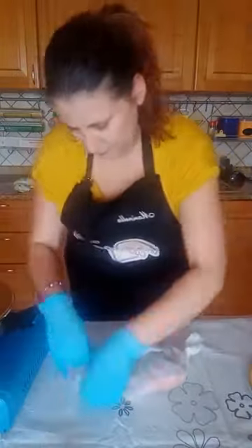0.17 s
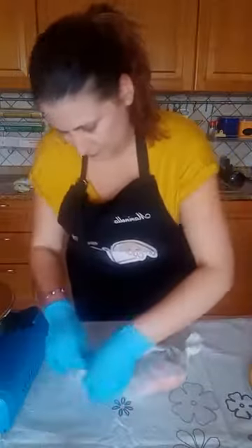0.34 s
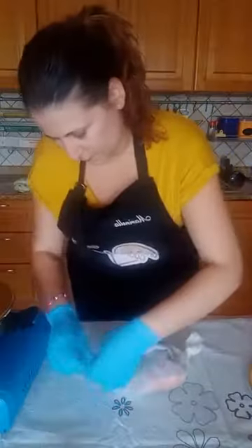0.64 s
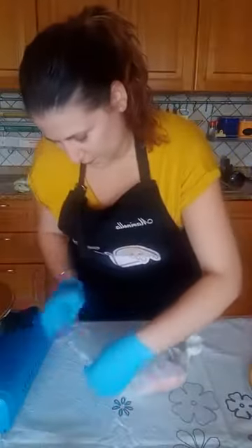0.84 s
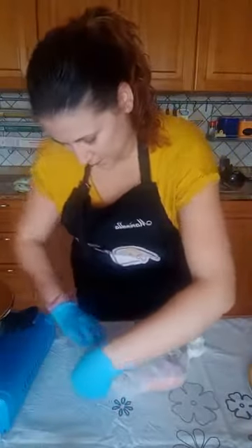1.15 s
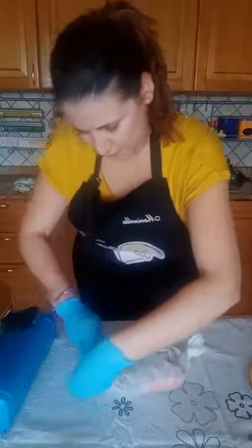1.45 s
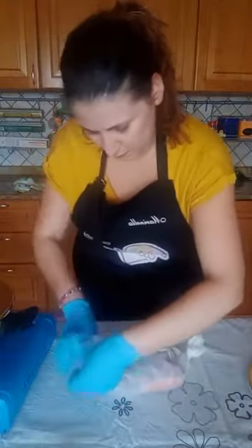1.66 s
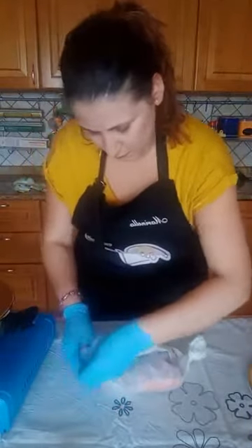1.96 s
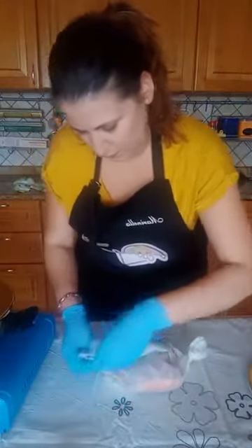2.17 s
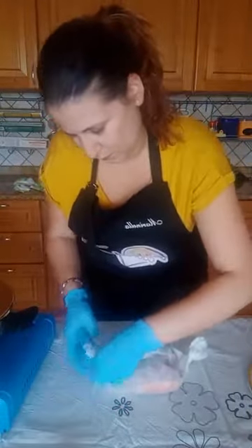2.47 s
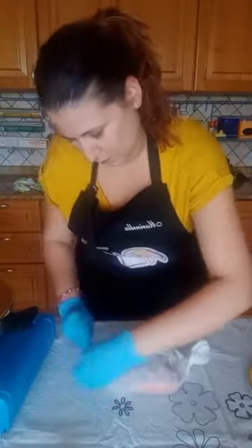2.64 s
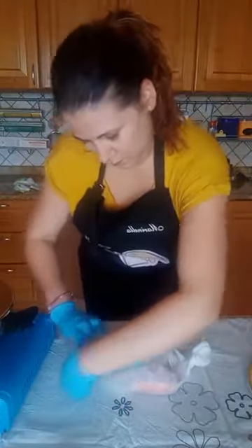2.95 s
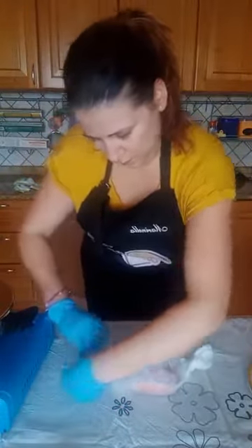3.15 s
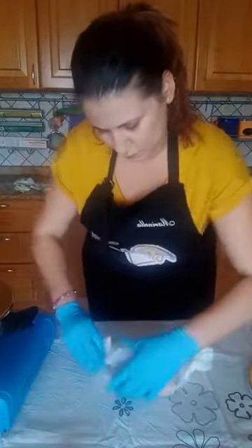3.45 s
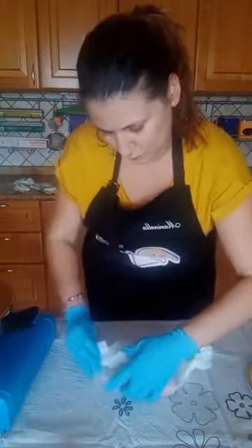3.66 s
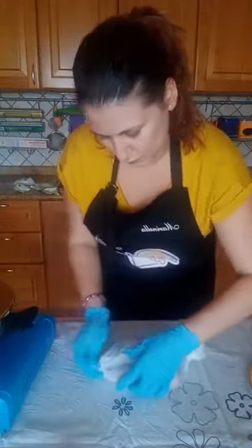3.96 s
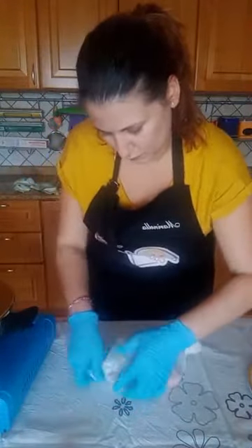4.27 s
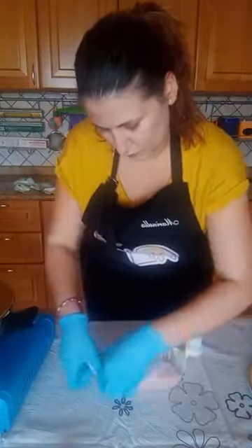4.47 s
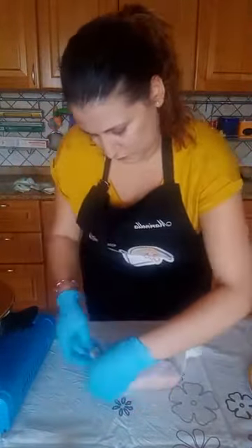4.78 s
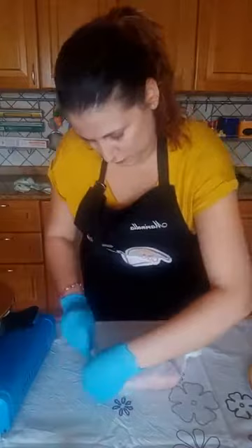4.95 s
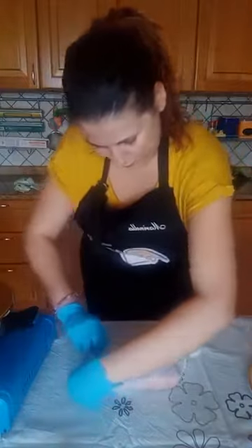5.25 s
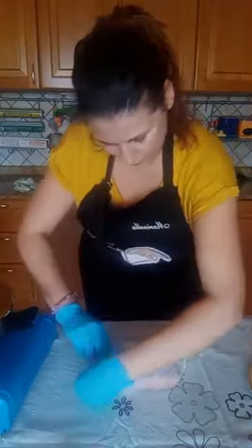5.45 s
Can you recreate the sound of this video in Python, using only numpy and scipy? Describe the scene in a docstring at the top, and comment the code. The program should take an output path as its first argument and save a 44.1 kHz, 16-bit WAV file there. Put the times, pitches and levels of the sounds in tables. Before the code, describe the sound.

A soft low thud on a table and a burst of dense paper crackle open the sound. Gloved hands then fold and twist baking paper in uneven squeezes, with sharp dry snaps, a brief high rasp near one second and occasional soft bumps. The crinkling thins in the last second and a half. Close microphone about a metre away, hard-walled kitchen with short reverberation, faint hum and thin hiss.

```python
"""A soft low thud on a table top and a swell of dense crackle come first,
over a faint low hum with a thin steady hiss near 2.7 kHz.
Gloved hands fold and twist a sheet of baking paper on a kitchen table, a metre from the microphone.
Creases buckle as clumped short pings and as sharp snaps of filtered noise; a taut edge rasps briefly.
Larger panels and the table's modes answer lower down; a hard-walled kitchen adds echoes and a short tail."""
import sys
import numpy as np
from scipy import signal
from scipy.fft import rfft, irfft
from scipy.io import wavfile

SR = 44100
rng = np.random.default_rng(int(sys.argv[2]) if len(sys.argv) > 2 else 0)


def unload_audio(sound):
    """Save the sound as a 16-bit wav file, at the path given as the first command line argument."""
    columns = np.transpose(np.atleast_2d(sound))
    # keep every value between -1 and 1, then stretch to whole-number steps
    steps = np.round(np.clip(columns, -1, 1) * 32767)
    wavfile.write(sys.argv[1], SR, steps.astype(np.int16))


N = 247439


def gain_of(db):
    """Level definition: decibels become an amplitude factor."""
    return 10 ** (np.asarray(db) / 20)


def evened(x):
    """Power normalisation: scales a signal to rms 1."""
    return x / np.sqrt(np.mean(x ** 2) + 1e-20)


def read(points, hz):
    """Logarithmic frequency scale: interpolates a curve evenly per octave."""
    f, value = np.transpose(points)
    return np.interp(np.log(hz + 1), np.log(f + 1), value)


def follow(rows):
    """Piecewise-linear envelopes: each column of a timed table at every sample."""
    s, *columns = np.transpose(rows)
    return [np.interp(np.arange(N) / SR, s, column) for column in columns]


def resonate(x, hz, width):
    """Simple resonance: a second-order peak filter with gain 1 at its centre."""
    b, a = signal.iirpeak(hz, hz / width, SR)
    return signal.lfilter(b, a, x)


def ping(hz, cycles):
    """Damped free oscillation: a buckling patch rings for a few dying cycles, energy 1."""
    turns = np.arange(0, 7 * cycles, hz / SR)
    onset = 1 - np.exp(-turns / 0.81)
    wave = np.sin(2 * np.pi * turns) * np.exp(-turns / cycles) * onset
    return wave / np.linalg.norm(wave)


# Noise spectrum of the idle room, relative: (frequency [Hz], density [dB per Hz])
ROOM_SPECTRUM = [(18, -44), (30, -3), (115, 9), (156, -21), (300, -19), (1480, -33), (2680, 0), (3740, -15),
                 (6600, -19), (14300, -32)]
ROOM_DB = -65.5  # rms level


def idle_room():
    """Stationary coloured noise: white noise shaped into a low hum and a thin hiss near 2.7 kHz."""
    spectrum = rfft(rng.standard_normal(N))
    shaped = spectrum * gain_of(read(ROOM_SPECTRUM, np.fft.rfftfreq(N, 1 / SR)))
    return gain_of(ROOM_DB) * evened(irfft(shaped, N))


# A hand or the parcel lands, before the table responds: (time [s], peak level [dB], pitch [Hz])
THUDS = [(0.0, -27.5, 145), (0.226, -35, 400), (0.325, -58, 345), (0.5127, -25, 794), (0.517, -27.5, 403),
         (1.91, -35.5, 410), (2.198, -40.5, 180), (2.869, -37, 380), (2.878, -40, 250), (3.472, -40.5, 325),
         (3.772, -33.5, 570), (4.288, -40, 322), (5.057, -44, 700), (5.073, -51, 292), (5.35, -46, 202),
         (5.388, -53, 215), (5.424, -48, 300)]


def thuds():
    """Impact excitation: each landing is one soft, heavily damped push."""
    out = np.zeros(N + SR)
    for s, peak_db, hz in THUDS:
        push = ping(hz, cycles=0.72)
        at = round(s * SR)
        out[at:at + len(push)] += gain_of(peak_db) * push / abs(push).max()
    return out[:N]


# Modes of the table top: (frequency [Hz], width [Hz], level [dB])
TABLE_MODES = [(123.8, 2.4, -8), (208.5, 13, -8), (403.9, 6.4, 2.5)]


def table(x):
    """Modal superposition: pressure on the top is heard directly and through its modes."""
    modes = sum(gain_of(db) * resonate(x, hz, width) for hz, width, db in TABLE_MODES)
    return 0.63 * x + modes


# Each squeeze or twist swells, then dies away; the last three levels are relative to the crackle:
# (start [s], swell [s], crackle [dB], fade [dB/s], small panels [dB], large panels [dB], weight [dB])
SQUEEZES = [(-0.02, 0.0086, -41.5, 22.5, -3, -5.5, -9.5), (0.2, 0.026, -44.5, 13.5, -2.5, -6.5, -30),
            (0.31, 0.033, -45, 71, -11, -17, -16), (0.5, 0.064, -39.5, 60, -4, -10, -18),
            (.62, 0.036, -49.5, 77, -3, -2, -5.5), (0.77, 0.13, -57, 33, -3.5, -26, -23),
            (0.93, 0.11, -45, 43, -5, -10.5, -26), (1.04, 0.031, -39, 26, -7.5, -11, -21.5),
            (1.1, 0.12, -42.5, 35, -5, -10, -18.5), (1.24, 0.037, -44, 11, -4.5, -10.5, -17),
            (1.36, 0.032, -44, 40, -5, -8.5, -33), (1.53, 0.014, -47, 25, -4, -8.5, -30),
            (1.63, .04, -49.5, 24, -10, -10, -12), (1.75, 0.072, -53, 22, -2, -5, -24),
            (1.85, 0.029, -40.5, 66, -4.5, -17, -35), (1.94, 0.024, -48, 53, -4, -12, -15),
            (2.04, 0.11, -52, 23, -4, -10, -18), (2.15, 0.051, -40.5, 22.5, -6.5, -11, -21.5),
            (2.28, 0.12, -43.5, 59, -5.5, -6.5, -36), (2.44, 0.011, -58, 53, 0, -9, -35),
            (2.58, 0.038, -48, 18, -8, -23, -26), (2.74, 0.028, -47, 31, -7, -13, -13),
            (2.85, 0.017, -46.5, 37, -3, -6.5, -15), (2.94, 0.037, -52, 58, -5, -16, -4),
            (3.06, 0.094, -43.5, 22.5, -7, -17.5, -36), (3.23, 0.035, -44.5, 19, -8, -14, -20.5),
            (3.385, 0.056, -40.5, 80, -5, -11.5, -36), (3.49, 0.12, -51.5, 26, -0.5, -8, -20),
            (3.6, 0.099, -44.5, 13.5, -8, -14, -18.5), (3.75, 0.0046, -43.5, 31, -10, -12.5, -33),
            (3.84, 0.025, -47.5, 51.5, -4, -28, -28), (3.97, 0.14, -55.5, 36, 1.5, -5, -14),
            (4.19, 0.016, -58.5, 64, -17, 0, -25), (4.28, 0.082, -55, 61, -13, -3.5, -12),
            (4.455, 0.038, -50, 68, -3.5, -12.5, -18), (4.53, 0.013, -56, 76, 0.5, -2.5, -17),
            (4.68, 0.0082, -53.5, 41, -5.5, -35, -11.5), (4.81, 0.098, -51.5, 97, -8, -45, -15.5),
            (4.95, 0.1, -65, 64, -13, -21, 4.5), (5.063, 0.016, -48, 87, -15.5, -14, -21),
            (5.16, 0.021, -55, 47, -6.5, -11, -12), (5.34, 0.0071, -60.5, 40, -2, -8, -8),
            (5.45, 0.02, -57.5, 52, -10, -32, -8)]
# Factors on each squeeze's fade: (crackle [ratio], small panels [ratio], large panels [ratio], weight [ratio])
FADE_SPEEDS = [1.374, 1.39, 1.55, 1.73]
SWELL_BEND = 1.2  # power grows as this exponent of the swell time


def handling():
    """Incoherent addition: the powers of all squeezes add, giving four level curves."""
    start, swell, crackle_db, fade, *panels_db = np.transpose(SQUEEZES)
    step = 64  # samples between points of the curves
    age = np.arange(0, N + step, step)[:, None] / SR - start
    rising = np.clip(age / swell, 0, 1) ** SWELL_BEND
    faded_db = fade * np.maximum(age - swell, 0)
    curves = []
    for relative_db, speed in zip([0, *panels_db], FADE_SPEEDS):
        amplitude = gain_of(crackle_db + relative_db - speed * faded_db)
        level = np.sqrt((rising * amplitude ** 2).sum(axis=1))
        curves.append(np.interp(np.arange(N) / step, np.arange(len(level)), level))
    return curves


def clumping(length_ms, depth_db):
    """Cascade triggering: a crease sets off its neighbours, so buckling comes in fast-starting bursts."""
    # a second of lead-in lets the drift settle
    kicks = rng.standard_normal(N + SR) * (rng.random(N + SR) < 400 / SR)
    decay = np.exp(-1000 / (length_ms * SR))
    drift = signal.lfilter([1], [1, -decay], abs(kicks))[SR:]
    burst = gain_of(depth_db * evened(drift - drift.mean()))
    return burst / burst.mean()


def grains(lo_hz, hi_hz, per_s, cycles, spread_db, clumps, count):
    """Random impulse excitation: each pitch has its own sparse train, and all crowd into the same clumps."""
    out = np.zeros(N)
    for hz in np.geomspace(lo_hz, hi_hz, count):
        fires = rng.random(N) < per_s / count / SR * clumps
        size_db = spread_db * np.minimum(rng.exponential(1, N), 5)
        size = gain_of(size_db) * rng.choice([-1, 1], N)
        out += np.sqrt(hz) * signal.oaconvolve(fires * size, ping(hz, cycles))[:N]
    # a small patch is too small to radiate far below its own pitch
    highpass = signal.butter(4, 0.67 * lo_hz, "highpass", fs=SR, output="sos")
    return evened(signal.sosfilt(highpass, out))


def crackle():
    """Size scaling: small creases ring high, panels of the parcel lower, the load on the table lowest."""
    creases, small_panels, large_panels, weight = handling()
    clumps = clumping(length_ms=8., depth_db=5.5)
    even = clumps ** 0.55  # bigger panels buckle more evenly
    fine = grains(2910, 8700, per_s=3000, cycles=1.34, spread_db=1.0, clumps=clumps, count=16)
    sheen = grains(9900, 12400, per_s=4300, cycles=1.4, spread_db=.6, clumps=clumps, count=4)
    small = grains(925, 2554, per_s=2200, cycles=1.08, spread_db=1.5, clumps=even, count=8)
    large = grains(396.0, 910, per_s=900, cycles=1.0, spread_db=2.5, clumps=even, count=8)
    pushes = grains(95.0, 276, per_s=300, cycles=1.73, spread_db=3.0, clumps=even, count=5)
    panels = small_panels * small + large_panels * evened(table(large))
    load = weight * evened(table(pushes))
    return creases * (fine + gain_of(-6.5) * sheen) + panels + load


# Decay time of the room: (frequency [Hz], t60 [s])
KITCHEN_DECAY = [(150, 0.3), (800, 0.36), (3000, 0.5), (9000, 0.35)]


def tail():
    """Frequency-dependent reverberation: random-sign taps die at each band's own speed, energy 1."""
    taps = np.zeros(SR // 2)
    at = np.arange(600, len(taps) - 20, 20)
    taps[at + rng.integers(0, 20, len(at))] = rng.choice([-1., 1.], len(at))
    hz, t, z = signal.stft(taps, SR, nperseg=256)
    fall_db = -60 * t / read(KITCHEN_DECAY, hz)[:, None]
    decay = signal.istft(z * gain_of(fall_db), SR, nperseg=256)[1]
    return decay / np.linalg.norm(decay)


# Early reflections from table, wall and cupboards: (nominal delay [ms], level [dB])
ECHOES = [(1.1, -37), (5.6, -16.5), (8.3, -14), (12.5, -18)]
TAIL_DB = -3  # energy of the tail re the direct sound


def kitchen(x):
    """Image-source variation: the hands keep moving, so echoes and tail drift among several places."""
    out, places = x.copy(), 4
    turn = np.arange(N) / SR / .35  # one round of the places takes 0.35 s
    for place in range(places):
        response = gain_of(TAIL_DB) * tail()
        for ms, db in ECHOES:
            delay_ms = ms * (1 + .08 * rng.uniform(-1, 1))
            response[round(delay_ms * SR / 1000)] += gain_of(db)
        # equal-power crossfade between neighbouring places
        away = abs((turn - place / places + .5) % 1 - .5) * places
        share = np.cos(np.pi / 2 * np.minimum(away, 1))
        out += signal.fftconvolve(x * share, response)[:N]
    return out


# Single creases that snap; nominal peak, knock level relative to the snap's tick:
# (time [s], peak level [dB], pitch [Hz], knock level [dB], knock pitch [Hz], decay [ms])
SNAPS = [(0.0592, -23.5, 5840, -11, 925, 3), (0.075, -29, 6000, 4, 1500, 1.9),
         (0.0825, -21, 6570, -4, 1360, 5.1), (0.0885, -21, 5700, -10, 915, 2.4),
         (0.095, -37, 6000, -21, 1500, 1.4), (0.146, -27, 7000, 0.5, 1600, 1.2),
         (0.1544, -17.5, 5800, -4.5, 1260, 1.2), (0.159, -24, 6500, -20, 1500, 0.75),
         (0.2286, -30, 6500, -13, 1330, 2.7), (0.2391, -19.5, 6200, -12, 1500, 0.55),
         (0.3262, -25, 6060, -10, 556, 2.9), (0.359, -25.5, 6200, -0.5, 1100, 1.4),
         (0.4866, -31.5, 6600, 1, 1500, 1.5), (0.508, -40, 6000, -17, 2000, 1.2),
         (0.5141, -26, 6400, 10.5, 1820, 0.65), (0.516, -21, 5500, -13, 1900, 2.4),
         (0.5464, -28, 6600, -28, 412, 3.7), (0.5677, -24, 6000, -8, 890, 3.5),
         (0.5823, -23, 6400, -20, 1490, 1.3), (0.6357, -22.5, 6560, -9, 420, 2.6),
         (0.708, -25.5, 6200, -20, 1500, .7), (0.7928, -25, 5900, -25, 2310, 2),
         (0.837, -28.5, 3800, -48, 1260, 0.84), (0.853, -26, 8150, -20, 1500, .9),
         (0.8795, -27.5, 7000, -27, 2000, 0.69), (1.0006, -27.5, 7600, -7, 890, 0.59),
         (1.019, -28, 8500, -20, 1640, 1.2), (1.0465, -23, 5500, -3.5, 730, 1.2),
         (1.0595, -27, 6300, -21, 2200, 1.1), (1.12, -23, 9000, -34, 401, 2),
         (1.1355, -22, 8900, -16, 810, 1.9), (1.143, -12.5, 8950, -32, 814, 1.3),
         (1.216, -24, 6570, -15, 1137, 2.3), (1.2312, -28, 7000, -19, 1500, 1.2),
         (1.274, -22.5, 6330, -23, 1520, 2.2), (1.2972, -23, 6600, -11, 900, 1.1),
         (1.3176, -27, 5560, -13, 2400, 0.92), (1.5469, -30.5, 5570, 4, 2170, 4.1),
         (1.5728, -21.5, 6540, -27, 2020, 1.1), (1.611, -24.5, 6640, -27, 2400, 2.5),
         (1.65, -20.5, 6450, -9, 780, 0.86), (1.695, -27, 7500, -16, 2000, 0.64),
         (1.727, -25, 5940, -17, 2490, 2.6), (1.774, -30, 4970, -23, 1910, 2.7),
         (1.825, -25.5, 6260, -18, 1680, 1.2), (1.8681, -24.5, 6470, -2, 736, 1),
         (1.875, -30, 6430, -2.5, 2460, 1.6), (1.9215, -31, 6200, -3, 800, 0.65),
         (1.9608, -19.5, 7300, -5, 1630, 0.53), (2.0078, -29, 6360, -23, 2350, 1.2),
         (2.065, -29.5, 6720, -17, 2360, 0.89), (2.0848, -36, 6500, -20, 2000, .7),
         (2.1271, -30, 4700, -11, 1720, 3.2), (2.1861, -20.5, 4200, -4, 2470, 0.57),
         (2.237, -37, 5840, 1, 950, 1.1), (2.277, -25, 6030, -6.5, 900, 5.3),
         (2.3228, -22, 5550, -3.5, 2170, 1.6), (2.3534, -28.5, 7000, 3, 794, 2.3),
         (2.454, -23.5, 6600, -13, 1930, 0.78), (2.504, -24, 6800, -17, 744, 2.3),
         (2.5878, -28, 6740, -26, 2260, 2), (2.639, -28, 6230, -29, 2430, 2.4),
         (2.686, -23.5, 8700, -22, 2430, 1), (2.783, -28, 3400, -5, 920, 1.7),
         (2.8, -27.5, 6400, -17, 1820, 1.5), (2.839, -25.5, 6160, -8, 2410, 2.6),
         (2.8676, -24.5, 6160, -5, 695, 1.5), (2.9624, -24, 8800, -9, 780, 1.1),
         (2.9882, -34, 6580, 5.5, 2350, 0.72), (3.0226, -28, 6150, -16, 2000, 0.74),
         (3.078, -38, 7400, -22, 2000, .8), (3.1148, -29.5, 6000, -2, 1850, 1.1),
         (3.198, -26, 7160, -23, 2000, .7), (3.3307, -25, 6800, -16, 2420, 1.4),
         (3.393, -28, 8000, -20, 2000, 1), (3.422, -20.5, 7000, -5.5, 1440, 0.74),
         (3.4265, -20.5, 8500, -13, 1390, 0.76), (3.4318, -28, 7100, -23, 2400, 0.89),
         (3.44, -29, 6800, -19, 1500, 1.7), (3.448, -31, 6000, -5, 2400, .8),
         (3.459, -25.5, 6600, 1.5, 2000, 0.88), (3.4715, -25.5, 6000, 1, 700, 1.1),
         (3.503, -27, 6450, -22, 1940, 0.88), (3.525, -22, 6500, -18, 2000, 0.53),
         (3.542, -28, 5600, -18, 2400, .6), (3.658, -23, 7040, -19, 1980, .8),
         (3.666, -23.5, 5530, -9, 2000, 0.85), (3.689, -29, 6600, -7, 2020, .8),
         (3.7708, -24, 6140, -29, 2210, 2.9), (3.785, -24, 8500, -11, 2000, 1.1),
         (3.789, -26, 6000, -5, 1390, 0.96), (3.7995, -28, 6400, -25, 2000, 0.72),
         (3.816, -29, 6600, -20, 2000, .8), (3.848, -29, 6000, -17, 2400, 1.3),
         (3.89, -25, 6170, -28, 2020, 0.58), (3.948, -27, 5530, -8, 1410, 1.3),
         (3.96, -26.5, 5440, -15, 2000, 0.97), (4.0306, -28, 5900, -21, 2200, 1.7),
         (4.0854, -30, 7000, -24, 2000, .8), (4.1232, -24.5, 7050, -11, 2420, 0.59),
         (4.202, -30, 5950, -17, 1310, .7), (4.208, -30, 5900, -11, 1310, 1.6),
         (4.2253, -31, 6500, -17, 2000, 1), (4.258, -39, 5800, -19, 2000, 1.2),
         (4.2865, -23, 5000, -4.5, 586, 0.46), (4.291, -27, 6700, 2, 1390, 0.36),
         (4.324, -30, 5860, -7, 900, 1.2), (4.3541, -32, 6500, -12, 1470, 1.5),
         (4.357, -25.5, 6460, -1.5, 1420, 0.76), (4.3807, -29, 7100, -25, 1470, 1.2),
         (4.4535, -32, 6500, -20, 2000, 0.89), (4.4784, -30, 7500, -26, 2000, 0.86),
         (4.483, -28, 6230, -16, 2000, 0.75), (4.5018, -23, 6460, -18, 1550, 1.4),
         (4.5207, -29, 5500, -23, 2000, .6), (4.554, -28, 5700, -10, 2170, 2.6),
         (4.711, -35, 5600, -17, 2000, .8), (4.8245, -35.5, 6740, -23, 1700, 1.3),
         (4.8432, -33, 6430, -5, 1680, 1.3), (5.0304, -32.5, 8050, -47, 1830, 1),
         (5.035, -38, 5860, -26, 2000, 1.5), (5.074, -32, 5270, -5, 836, 1.1),
         (5.078, -34, 5600, -21, 900, 3.1), (5.089, -38, 6200, -3, 2400, 4.5),
         (5.119, -44, 6000, -20, 2400, 0.63), (5.1858, -37, 6100, -4, 2450, 1.2),
         (5.2146, -40, 6500, -20, 2000, .6), (5.3314, -32.5, 6500, -17.5, 2000, .6),
         (5.348, -33.5, 6100, -8.5, 2340, 1.5), (5.353, -32, 6050, -28, 2400, 0.84),
         (5.459, -31.5, 5660, -24, 2460, 0.9), (5.478, -39, 5300, -20, 2400, 1.2),
         (5.499, -44, 6500, -11, 2400, 1)]


def snaps():
    """Snap-through buckling: a brief noise burst, strongest at its own pitch, on a low knock."""
    length = 1024
    out, t = np.zeros(N + length), np.arange(length) / SR
    noises = rng.standard_normal((len(SNAPS), 2, length))
    for (s, peak_db, hz, knock_db, knock_hz, ms), noise in zip(SNAPS, noises):
        shape = (1 - np.exp(-t / 0.00046)) ** 2 * np.exp(-t * 1000 / max(ms, .2))
        burst = noise[0] * shape
        broad = resonate(resonate(burst, 6800, 6100), 5400, 7500)
        tick = 0.28 * broad + 7.0 * resonate(burst, hz, 0.34 * hz)
        push = noise[1] * shape ** 0.8
        knock = resonate(push, knock_hz, 0.3 * knock_hz) + 0.12 * resonate(push, 1100, 2200)
        # a longer burst of the same peak holds more energy
        size = 0.4 * np.linalg.norm(shape) / shape.max()
        snap = tick / np.linalg.norm(tick) + gain_of(knock_db) * knock / np.linalg.norm(knock)
        at = round(s * SR)
        out[at:at + length] += gain_of(peak_db) * size * snap
    return out[:N]


# A taut edge slides with a thin whistle: (time [s], upper band level [dB], lower band level [dB])
RASP = [(1.085, -62, -62), (1.103, -36, -54), (1.112, -51, -54), (1.121, -30, -54), (1.13, -38, -41),
        (1.14, -32.5, -44), (1.152, -50, -38.5), (1.18, -56, -52), (1.2, -45, -57), (1.22, -64, -54)]
# Its upper and lower band: (frequency [Hz], width [Hz])
RASP_BANDS = [(8860, 420), (6620, 120)]


def rasp():
    """Friction excitation: uneven slips of the sliding edge ring two narrow bands."""
    s = np.arange(N) / SR
    sliding = (s > RASP[0][0]) & (s < RASP[-1][0])
    slips = (rng.random(N) < 1500 / SR) * gain_of(1.7 * rng.exponential(1, N))
    out = np.zeros(N)
    for level_db, (hz, width) in zip(follow(RASP), RASP_BANDS):
        band = evened(resonate(resonate(slips, hz, width), hz, 2 * width))
        out += gain_of(level_db) * band
    return sliding * out


def scene():
    """Linear superposition: paper and table sound in the kitchen, over the idle room's noise."""
    paper = crackle() + snaps() + rasp()
    return (kitchen(paper + table(thuds())) + idle_room())[None]


# Response of the microphone: (frequency [Hz], gain [dB])
MICROPHONE = [(30, -15), (70, -23.5), (130, -6.5), (400, -5), (4000, -3.5), (5200, -2.5), (6500, 0),
              (7900, -5.5), (9000, -1), (10300, -11), (13000, -19), (14300, -24)]
EDGE_HZ = 14450  # upper band limit


def record(dry):
    """Minimum-phase filtering: the microphone's colour acts causally, then the band is limited."""
    log_gain = np.log(gain_of(read(MICROPHONE, abs(np.fft.fftfreq(8192, 1 / SR)))))
    # the Hilbert transform of the log gain gives the minimum phase
    phase = -signal.hilbert(log_gain).imag
    colour = np.fft.ifft(np.exp(log_gain + 1j * phase)).real[:4096]
    coloured = signal.oaconvolve(dry, colour[None])[:, :N]
    lowpass = signal.firwin(511, EDGE_HZ, window=("kaiser", 9), fs=SR)
    return signal.oaconvolve(coloured, lowpass[None], "same")


dry = scene()
out = record(dry)
unload_audio(out)
```